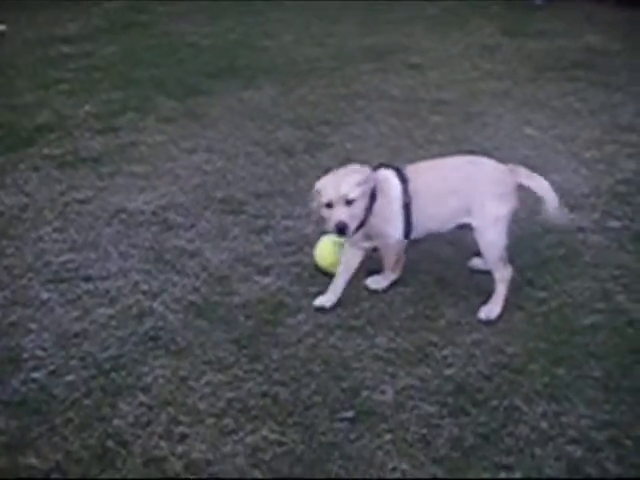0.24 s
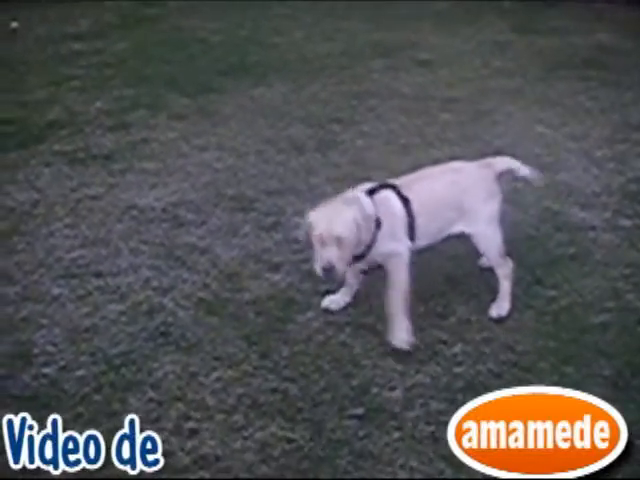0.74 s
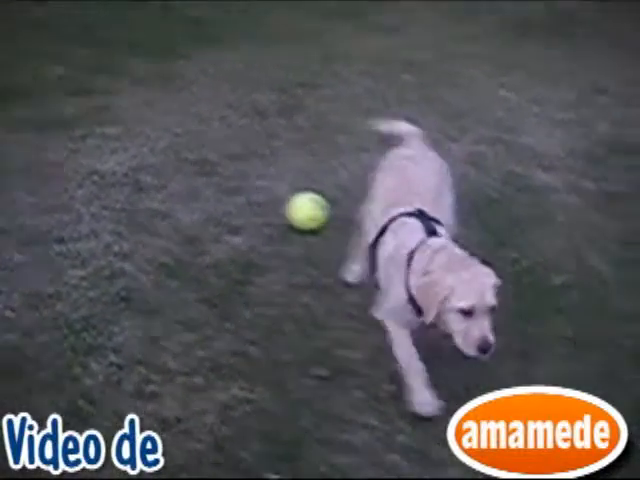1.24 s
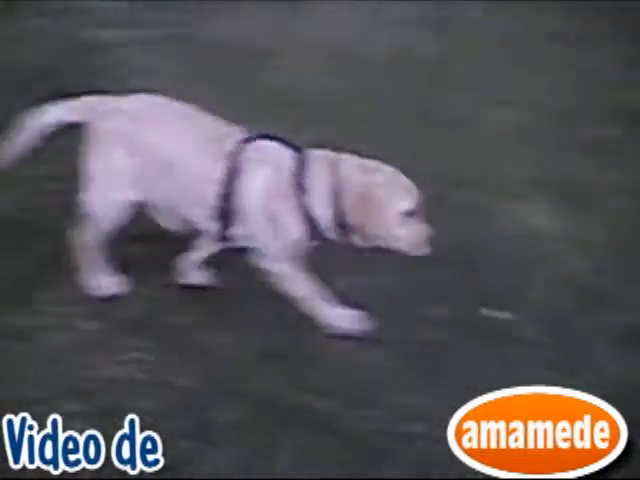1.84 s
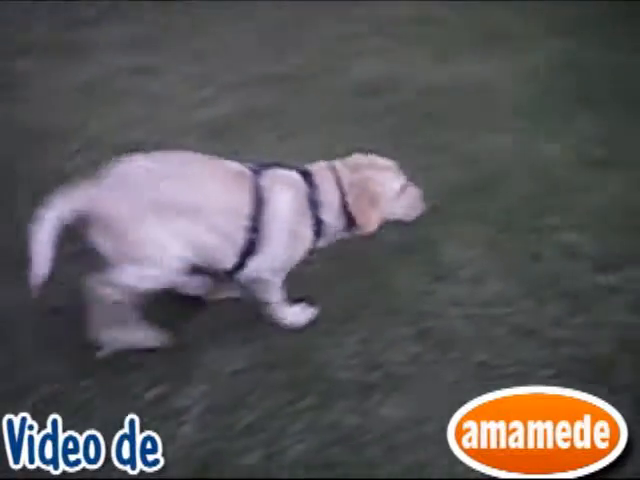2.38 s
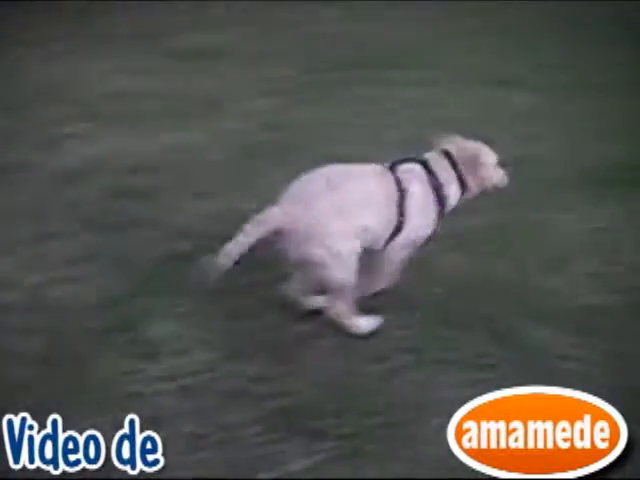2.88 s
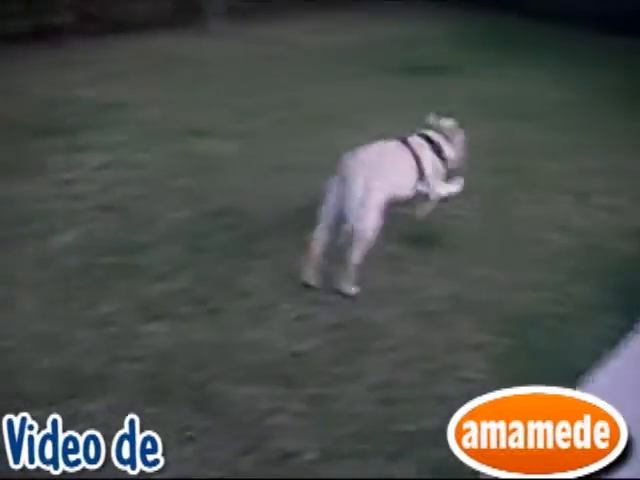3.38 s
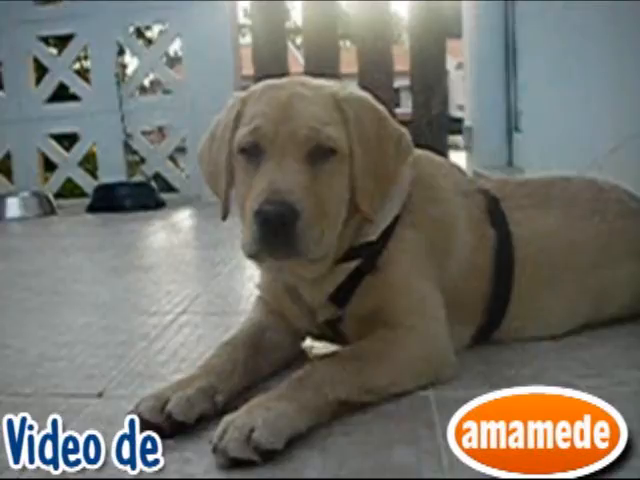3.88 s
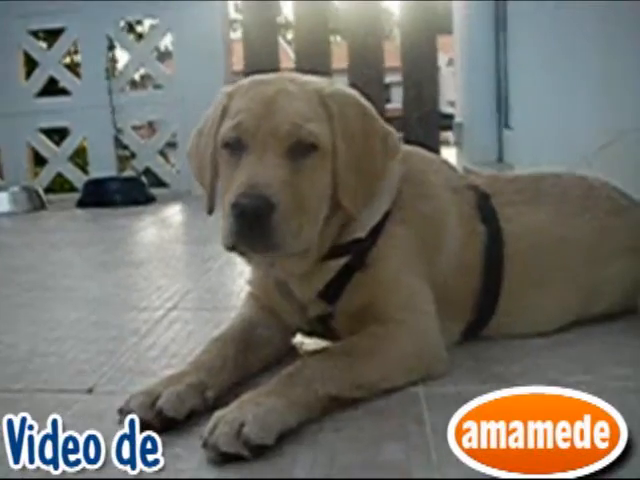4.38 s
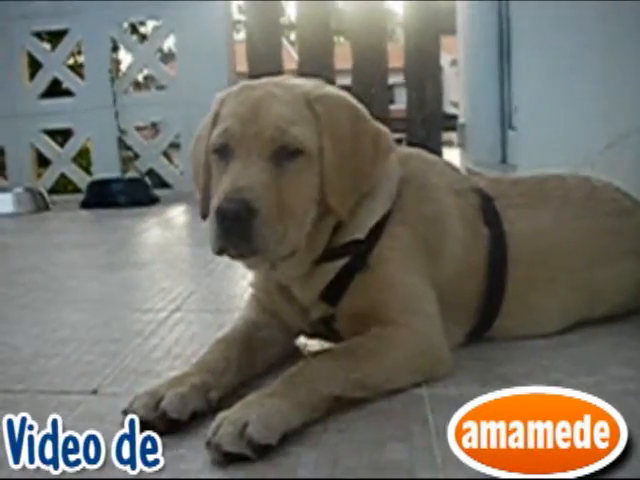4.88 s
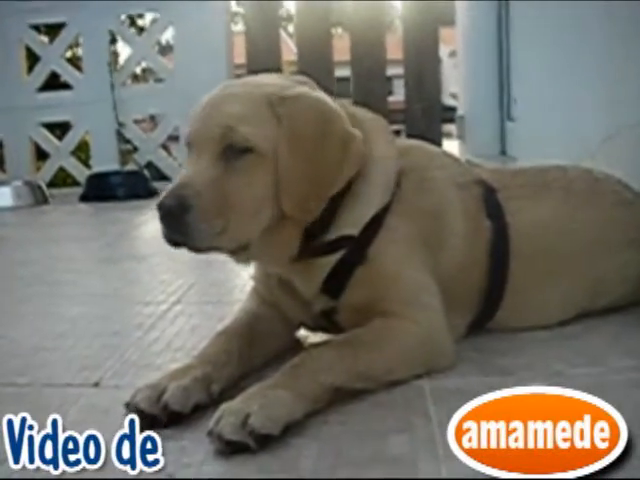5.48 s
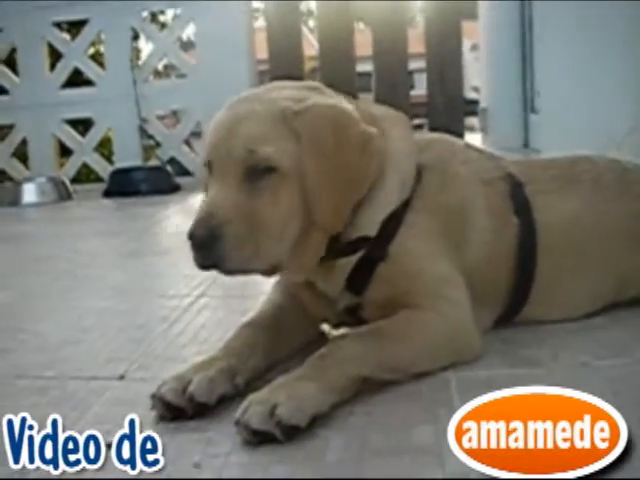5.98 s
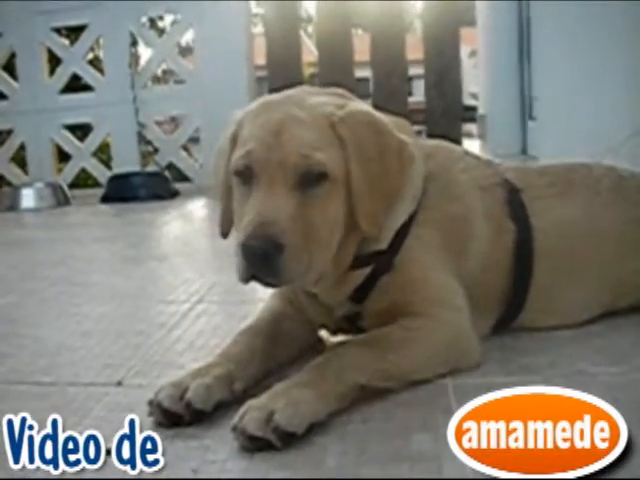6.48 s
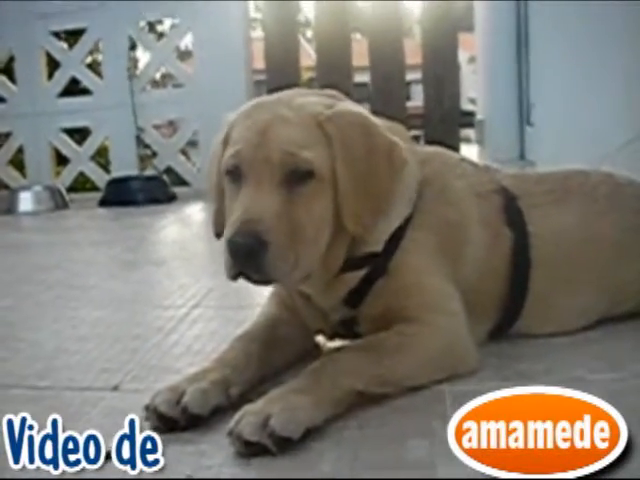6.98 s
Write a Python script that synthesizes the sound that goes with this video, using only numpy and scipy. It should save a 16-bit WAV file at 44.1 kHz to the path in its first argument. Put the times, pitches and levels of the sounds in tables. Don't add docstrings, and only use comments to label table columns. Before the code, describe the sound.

A nearby songbird opens with fast upward flicks, then rounder falling chups and two quick high endings. A gap of soft distant birdsong follows, with a farther bird on the left repeating one flat whistle. The near bird resumes with clucks, rising and falling sweeps, and six strong falling notes, while something hollow is tapped. A small stereo recorder in a garden catches short echoes and constant hiss.

```python
import sys
import numpy as np
from scipy import signal
from scipy.io import wavfile
from scipy.ndimage import uniform_filter1d, minimum_filter1d

SR = 44100
rng = np.random.default_rng(int(sys.argv[2]) if len(sys.argv) > 2 else 0)


def elevation(decibels):
    levels = np.asarray(decibels, float)
    return 10 ** (levels / 20)


def dump(signal):
    limited = np.clip(np.atleast_2d(signal).T, -1, 1)
    pcm = np.round(limited * 32767).astype(np.int16)
    wavfile.write(sys.argv[1], SR, pcm)


N = 318843


def evened(x):
    return x / np.sqrt(np.mean(x ** 2) + 1e-20)


def read(points, hz):
    f, value = np.transpose(points)
    return np.interp(np.log(hz + 1), np.log(f + 1), value)


def band(x, lo_hz, hi_hz, order=2):
    return signal.sosfiltfilt(signal.butter(order, [lo_hz, hi_hz], "bandpass", fs=SR, output="sos"), x)


def add(mix, s, sound):
    part = mix[round(s * SR):][:len(sound)]
    part += sound[:len(part)]


def stroke(rows, quiver_db=0.7):
    s, hz, db = np.transpose(rows)
    t = np.arange(s[0], s[-1], 1 / SR)
    hz = uniform_filter1d(np.interp(t, s, hz), size=70, mode="nearest")
    size = uniform_filter1d(np.interp(t, s, elevation(db)), size=70, mode="nearest")
    quiver = quiver_db * np.sin(2 * np.pi * (rng.uniform(120, 260) * t + rng.random()))
    tone = np.sin(2 * np.pi * (np.cumsum(hz) / SR + rng.random()))
    soft_ends = signal.windows.tukey(len(t), min(1, 90 / len(t)))
    return s[0], size * elevation(quiver) * tone * soft_ends


def glides(table):
    out = np.zeros(N)
    for s, length, first_hz, last_hz, db in table:
        middle = (s + length / 2, (first_hz + last_hz) / 2, db)
        add(out, *stroke([(s, first_hz, db - 12.5), middle, (s + length, last_hz, db - 8.5)]))
    return out


# t/s after its start, f/Hz, level/dB
TRILL = [
    [(0.002, 2900, -49), (0.0045, 4100, -29), (0.008, 5900, -24), (0.012, 7400, -37), (0.018, 8400, -45)],
    [(0.0045, 2400, -44), (0.0075, 4000, -21), (0.0105, 5100, -16.5), (0.0135, 6100, -21),
     (0.016, 6800, -40)],
]
CHUP = [
    [(-0.001, 2250, -32), (0.002, 2520, -12), (0.005, 2680, -8.5), (0.009, 2735, -8), (0.014, 2630, -8.2),
     (0.02, 2380, -8), (0.024, 2082, -16), (0.03, 1850, -30), (0.048, 1430, -48)],
]
LEAD = [
    [(0.0, 2450, -28), (0.003, 1750, -30), (0.008, 1574, -34.5), (0.016, 1396, -45.5)],
    [(0.0, 3500, -54.5), (0.006, 2950, -43), (0.014, 2550, -55.5)],
]
DROP = [
    [(0, 7080, -46), (.005, 5920, -30.5), (.011, 4990, -17.5), (.015, 4650, -19.5), (.02, 3900, -31)],
]
PIP = [
    [(0.0, 2360, -39), (0.007, 2810, -30.5), (0.014, 3330, -42)],
    [(0.008, 2120, -27.5), (0.014, 2260, -23), (0.021, 2350, -20.5), (0.028, 2224, -29.5),
     (0.033, 2430, -39)],
]
RISE = [
    [(0.0, 2790, -24), (0.004, 2740, -18.5), (0.01, 3013, -10), (0.016, 3320, -14), (0.021, 3876, -9.5),
     (0.026, 4300, -14.5)],
]
FALL = [
    [(0.002, 8100, -56), (0.007, 6010, -17), (0.011, 4310, -12), (0.014, 3460, -20)],
    [(0.0, 12490, -33), (0.006, 9500, -40), (0.012, 5960, -33.5), (0.016, 4700, -12), (0.022, 4203, -13),
     (0.029, 3910, -18)],
    [(0.026, 2800, -32), (0.032, 2950, -14), (0.036, 2930, -6.5), (0.044, 2550, -7), (0.049, 2100, -13),
     (0.053, 1900, -32), (0.06, 1600, -42)],
]
LIFT = [
    [(0.0, 2050, -29), (0.006, 3300, -22), (0.011, 4200, -8), (0.015, 4550, -13), (0.019, 4700, -12.5),
     (0.027, 4800, -21), (0.033, 4850, -32), (0.041, 4900, -44)],
]
HOOK = [
    [(0.0, 1950, -38), (0.004, 2170, -19), (0.01, 2295, -11), (0.016, 2070, -14.5), (0.019, 1930, -25),
     (0.025, 1600, -41)],
]
# t/s after its start, f/Hz, level/dB
CLIPPED_CHUP = [
    [(0.0, 2570, -33), (0.003, 2720, -12), (0.009, 2620, -9.5), (0.016, 2410, -8), (0.022, 2010, -20),
     (0.03, 1770, -33), (0.044, 1520, -40)],
]
DIP = [
    [(0.001, 6500, -44), (0.004, 4300, -28), (0.008, 3300, -17), (0.014, 3400, -19), (0.019, 4000, -10.5),
     (0.022, 4900, -22), (0.026, 6400, -36)],
    [(0.0, 4400, -24), (0.002, 3500, -17), (0.004, 2600, -27), (0.007, 2000, -38)],
]
FORK = [
    [(0.005, 4300, -30), (0.009, 3850, -19), (0.017, 3900, -17)],
]
BOWL = [
    [(0.0, 5000, -32), (0.004, 3800, -24), (0.01, 3200, -22), (0.016, 3500, -24), (0.019, 3950, -12),
     (0.021, 4500, -27), (0.023, 5000, -16), (0.025, 5800, -34), (0.03, 7800, -46)],
    [(0.0, 4300, -27), (0.002, 3000, -25), (0.005, 2000, -36)],
]
SIGH = [
    [(0.0, 7870, -69), (0.015, 6330, -62), (0.035, 5560, -53), (0.065, 5230, -43), (0.09, 4910, -28),
     (0.108, 4877, -20.5), (0.121, 4940, -27), (0.126, 5150, -43), (0.133, 5600, -50)],
    [(0.125, 4930, -46), (0.18, 4920, -50), (0.205, 4915, -60), (0.23, 4915, -52), (0.31, 4910, -52),
     (0.33, 4910, -63), (0.365, 4910, -51), (0.41, 4905, -61), (0.54, 4900, -62)],
]
DUET = [
    [(0.007, 4680, -43), (0.019, 4810, -31.5), (0.039, 4766, -23.5), (0.054, 4660, -37), (0.079, 4784, -33),
     (0.091, 4800, -38)],
    [(0.0, 5960, -52), (0.044, 6120, -37.5), (0.064, 6000, -43), (0.091, 6140, -57)],
]
SLIDE = [
    [(0.0, 6500, -60), (0.012, 6010, -36), (0.022, 6140, -32), (0.029, 6040, -40)],
    [(0.009, 4550, -32.5), (0.022, 4690, -32), (0.034, 4470, -24), (0.045, 3940, -10.5),
     (0.055, 3300, -16.5), (0.065, 3030, -11.5), (0.075, 2975, -19), (0.083, 2680, -39)],
]
SURGE = [
    [(0.0, 2720, -28), (0.004, 2720, -18), (0.012, 3020, -15.5), (0.018, 3550, -17), (0.022, 4050, -9.5),
     (0.026, 4300, -24)],
    [(0.035, 5500, -32), (0.039, 5450, -19), (0.044, 5250, -16), (0.047, 4800, -21), (0.051, 4300, -30)],
]
HELD = [
    [(0.0, 2280, -30), (0.003, 2240, -17), (0.01, 2170, -17.5), (0.018, 2050, -30), (0.026, 2129, -13),
     (0.035, 2090, -14), (0.038, 1920, -27), (0.045, 1650, -32)],
]
# t/s, effort level/dB, stretch in time [factor], shift of f [factor]
TRILLS = [
    (0.025, 1, 1.01),
    (0.085, 1.1, 0.95),
    (0.143, 1.1, 1.01),
    (0.202, 0.8, 1.01),
    (0.263, 1, 1.01),
    (0.3245, 1, 1.01),
    (0.384, 1.5, 1.05),
    (0.45, 3, 1.08, 0.95),
]
CHUPS = [
    (.556, -1.5, .88, .98),
    (.8053, -.3, 1.12, 1.035),
    (.941, .3, 1, 1),
    (1.0715, .7, .98, 1.005),
    (1.213, .1, 1.16, 1.02),
    (1.3505, .3, 1.24, .99),
]
DROPS = [
    (5.89, -1.6, .8, 0.98),
    (6.074, -0.33, 1.2, 0.99),
    (6.177, -0.67, 0.91, 1.027),
]
PIPS = [
    (5.3118, 0.15, 1.1, 1.044),
    (5.397, -0.27, 1.03, 1.014),
    (5.483, -0.88, 1.08, 1.02),
]
RISES = [
    (5.855, 0.6, 0.91, 0.96),
    (6.041, -1, 0.95, 0.96),
    (6.143, 1.5, 0.92, 0.97),
]
FALLS = [
    (6.4403, -1),
    (6.579, -1.9),
    (6.724, -0.19),
    (6.874, -1.3),
    (7.014, -1.6, 1.04),
    (7.1512, -2.3),
]
LIFTS = [
    (1.487, 0.1, 1.01),
    (1.5755, -1.5, 0.85),
]
HOOKS = [
    (6.296, -1.5),
    (6.329, -2.5, 0.84, 1.015),
]
# pattern, t/s
ONCE = [
    (CLIPPED_CHUP, 0.684),
    (DIP, 1.467),
    (FORK, 1.467),
    (BOWL, 1.555),
    (SIGH, 4.345),
    (DUET, 5.136),
    (SLIDE, 5.563),
    (SURGE, 5.9475),
    (HELD, 6.246),
]
# t/s, length/s, first f/Hz, last f/Hz, level/dB
CLUCKS = [
    (1.677, 0.006, 2770, 4170, -28),
    (4.222, 0.007, 4200, 3200, -34.5),
    (4.226, 0.0074, 3200, 2400, -35),
    (4.567, 0.008, 4600, 2700, -32.5),
    (4.602, 0.009, 2400, 1940, -34.5),
    (4.778, 0.012, 2650, 2450, -30.5),
    (4.785, 0.007, 3300, 2700, -41),
    (4.779, 0.011, 3970, 3500, -39.5),
    (5.877, 0.011, 4250, 5050, -28),
    (5.851, 0.006, 2550, 2650, -30),
]
# t/s, first f/Hz, last f/Hz, sag of f/Hz,
# level/dB, sag of level/dB, step/s
ROLLS = [
    (4.9425, 2650, 2420, -50, -29, -2.1, 0.0146),
    (5.72, 2550, 2250, -15, -37, -0.5, 0.0133),
    (5.72, 1800, 1650, -5, -40, -0.8, 0.0133),
]


def near_bird():
    rasp = 1 + 0.3 * evened(band(rng.standard_normal(N), 150, 690))
    rolled = []
    for s, first_hz, last_hz, sag_hz, db, sag_db, step_s in ROLLS:
        for k in range(6):
            bend_hz = sag_hz * (k - 3) ** 2
            level_db = db + sag_db * (k - 5 / 2) ** 2
            rolled.append((s + k * step_s, 0.009, first_hz + bend_hz, last_hz + bend_hz, level_db))
    out = glides(CLUCKS + rolled) * rasp
    lead_s, soft_db, full_db, warm_s = 0.0263, -1.5, 3.5, 0.75
    chup_times = [row[0] for row in CHUPS] + [ONCE[0][1]]
    leads = [(s - lead_s, soft_db if s < warm_s else full_db) for s in chup_times]
    song = [(TRILL, TRILLS), (CHUP, CHUPS), (LEAD, leads), (DROP, DROPS), (PIP, PIPS), (RISE, RISES),
            (FALL, FALLS), (LIFT, LIFTS), (HOOK, HOOKS)]
    song += [(syllable, [(s,)]) for syllable, s in ONCE]
    for syllable, times in song:
        for row in times:
            s, effort_db, stretch, pitch = row + (0, 0, 1, 1)[len(row):]
            for rows in syllable:
                add(out, *stroke(np.array(rows) * [stretch, pitch, 1] + [s, 0, effort_db]))
    return out


# t/s, length/s, f/Hz, level/dB
WHISTLES = [(0.088, 0.044, 2420, -48), (3.0, 0.115, 2590, -52), (3.22, 0.095, 2550, -50),
            (3.415, 0.08, 2560, -50), (3.605, 0.09, 2510, -49), (3.785, 0.095, 2435, -48),
            (3.995, 0.075, 2440, -48), (4.18, 0.075, 2530, -46), (4.375, 0.087, 2410, -46),
            (4.565, 0.095, 2480, -47), (4.815, 0.08, 2490, -49), (5.045, 0.105, 2390, -48),
            (5.345, 0.045, 2480, -47), (5.545, 0.08, 2430, -49), (5.79, 0.055, 2520, -47),
            (6.06, 0.075, 2380, -47)]
# share of its length, shift of f [factor], level/dB
WHISTLE_SHAPE = [
    (0, 0.96, -7),
    (0.25, 0.997, -0.5),
    (0.7, 1.007, -1.5),
    (1, 0.97, -6),
]


def far_bird(ratio):
    out = np.zeros(N)
    for start, length, hz, db in WHISTLES:
        scoop = (-.015 / length, .88, -17)
        rows = np.array([scoop] + WHISTLE_SHAPE) * [length, hz * ratio, 1] + [start, 0, db]
        s, tone = stroke(rows)
        add(out, s, elevation(5.2) * tone)
        add(out, s + .105, elevation(-5.5) * tone)
    return out


# t/s, blow level/dB, level/dB of the thump under it
TAPS = [(1.482, -49, -34.5), (2.144, -24.5, -67), (2.723, -31, -55), (3.851, -46, -38), (5.081, -16, -36),
        (5.537, -15, -37), (5.579, -34, -34), (5.623, -29, -32), (5.7245, -21.5, -37), (5.781, -21, -43),
        (5.887, -20.5, -42), (5.988, -20.5, -40), (6.111, -23.5, -39)]
# f/Hz, level/dB, time to fade by 60 dB/s
HOLLOW = [
    (858, -2, 0.023),
    (1390, 3.5, 0.0027),
    (2400, -48, .006),
    (410, 3.5, 0.0083),
]


def taps():
    out, t = np.zeros(N), np.arange(4000) / SR
    ring = sum(elevation(db - 60 * t / t60) * np.cos(2 * np.pi * hz * t) for hz, db, t60 in HOLLOW)
    ring = band(np.r_[np.zeros(400), ring], 330, 3000, order=4)
    muffled = 1.4 * band(ring, 380, 2120)
    thump = np.sin(2 * np.pi * 210 * t) * elevation(-60 * t / 0.012)
    for s, blow_db, thump_db in TAPS:
        add(out, s - 400 / SR + 0.00246, elevation(blow_db - 1.5) * (ring if s > 3 else muffled))
        add(out, s, elevation(thump_db + 10) * thump)
    return out


# t/s, level/dB
RUSTLE = [
    (0.37, -57),
    (0.414, -38),
    (0.472, -38),
    (0.498, -44),
    (0.52, -60),
]


def rustle():
    s, db = np.transpose(RUSTLE)
    grains = rng.standard_normal(N) * elevation(2.2 * rng.exponential(1, N))
    loudness = elevation(np.interp(np.arange(N) / SR, s, db, -120, -120))
    return loudness * evened(band(grains, 720, 1490))


# t/s, length/s, first f/Hz, last f/Hz, level/dB
DISTANT = [(2.0, 0.087, 4700, 5780, -57), (2.08, 0.055, 2880, 3150, -51), (2.122, 0.045, 3050, 4250, -47),
           (3.35, 0.03, 4500, 3950, -55), (2.32, 0.035, 3640, 3520, -51), (4.31, 0.065, 4700, 4250, -56),
           (4.38, .09, 4300, 4400, -55), (5.03, .07, 4600, 4150, -57), (.87, 0.055, 4700, 4620, -56.5),
           (4.75, .035, 5800, 5000, -58), (6.372, 0.045, 4600, 3350, -47)]
# length/s, first f/Hz, last f/Hz
UPSLUR = (0.055, 3950, 4750)
# t/s, level/dB
UPSLURS = [
    (2.31, -62),
    (2.47, -60),
    (2.63, -60),
    (2.79, -59),
    (2.95, -55),
    (3.11, -55),
    (3.29, -58),
    (3.53, -61),
]
# length/s, first f/Hz, last f/Hz
SEEP = (0.1, 5640, 5500)
# t/s, level/dB
SEEPS = [
    (2.17, -69),
    (2.32, -69),
    (2.5, -70),
    (2.65, -68),
    (2.82, -69),
]


def distant_birds():
    twitter = [(s, .022, 5600, 5000, -62) for s in 3.66 + .058 * np.arange(10)]
    chatter = []
    for a, b, c, d in rng.random((30, 4)):
        first_hz = 3500 + 2200 * c
        chatter.append((1.8 + 3.5 * a, .02 + .05 * b, first_hz, first_hz + 900 * (d - .5), -59 - 6 * b))
    repeated = [(s, *note, db) for note, times in [(UPSLUR, UPSLURS), (SEEP, SEEPS)] for s, db in times]
    flutter = 1 + 0.25 * evened(band(rng.standard_normal(N), 20, 160))
    return glides(DISTANT + chatter + twitter + repeated) * flutter


# delay t/s, level/dB
ECHOES = [
    (.0045, -18),
    (.0085, -23.5),
    (.013, -24.5),
    (.095, -44.5),
    (0.121, -42.5),
]
# f/Hz, time to fade by 60 dB/s
GARDEN = [
    (1500, .5),
    (2800, .72),
    (4500, .75),
    (4950, 1.05),
    (5500, 1.05),
    (8000, .6),
    (13000, .3),
]


def garden(x, quick_db=-18, quick_t60=0.074, long_db=-27):
    t = np.arange(SR) / SR
    scatter = rng.standard_normal((2, SR)) * (t > .003)
    hz, frames, z = signal.stft(scatter, SR, nperseg=256)
    fade = elevation(-60 * frames / read(GARDEN, hz)[:, None])
    tail = signal.istft(z * fade, SR, nperseg=256)[1][:, :SR]
    quick = (band(scatter, 3400, 9000) + 0.18 * scatter) * elevation(-60 * t / quick_t60)
    answer = elevation(long_db) * tail / np.linalg.norm(tail[0])
    answer += elevation(quick_db) * quick / np.linalg.norm(quick[0])
    for s, db in ECHOES:
        answer[0, round(s * SR)] += elevation(db)
    return signal.fftconvolve(x[None], answer, axes=1)[:, :N]


# f/Hz, level/dB (per Hz)
AIR = [(60, -40.5), (95, -9), (140, -4.5), (240, -1.5), (750, -2.5), (2150, -8.5), (3300, -11.5),
       (4800, -17.5), (6000, -30.5), (8500, -37.5), (11500, -30.5), (13500, -59.5)]


def air(patchy_db=1.29):
    frames, hz = N // 256 + 5, np.fft.rfftfreq(1024, 1 / SR)
    a, b, patches = rng.standard_normal((frames, 513, 3)).T
    patches = evened(uniform_filter1d(uniform_filter1d(patches, size=10, axis=0), size=14, axis=1))
    z = (a + 1j * b) * elevation(read(AIR, hz)[:, None] + patchy_db * patches)
    return elevation(-46) * evened(signal.istft(z, nperseg=1024, noverlap=768)[1][:N])


def scene():
    near, far, upper = near_bird(), far_bird(1), far_bird(3 / 2)
    distant = distant_birds()
    wet_mid, wet_side = garden(near + far + 3 * distant)
    mid = near + far + elevation(-22.5) * upper + distant + wet_mid + taps() + rustle() + air()
    side = -.06 * near - 0.26 * np.gradient(near)
    side += 0.77 * far - 3.0 * np.gradient(far) + elevation(-3.5) * upper
    side += 1.1 * distant + elevation(-2.5) * wet_side + elevation(-5) * air()
    side = band(side, 1900, 4060, order=6)
    return np.array([mid + side, mid - side])


def haze(x, frames, bins, db, lag):
    hz, _, z = signal.stft(x, SR, nperseg=256, noverlap=192)
    power = abs(z) ** 2
    steady = minimum_filter1d(uniform_filter1d(power, size=3, axis=0), size=11, axis=1)
    steady = -minimum_filter1d(-steady, size=19, axis=1)
    treble_share = np.clip((hz[:, None] - 2900) / 1500, .06, 1) ** 2
    power = np.maximum(power - 5 * steady, 0) * treble_share
    for _ in range(2):
        power = uniform_filter1d(uniform_filter1d(power, size=bins, axis=0), size=frames, axis=1, origin=lag)
    a, b = rng.standard_normal((z.shape[1], len(z), 2)).T
    grain = np.sqrt(abs(power)) * (a + 1j * b)
    return elevation(db) * signal.istft(grain, nperseg=256, noverlap=192)[1][:N]


def starve(x, from_hz=5200, below_db=-50, chance_db=9):
    hz, _, z = signal.stft(x - x.mean(), SR, nperseg=1024, noverlap=768)
    power = uniform_filter1d(abs(z.mean(0)) ** 2, size=7, axis=0)
    strips = rng.standard_normal(power.T.shape).T
    strips = evened(uniform_filter1d(uniform_filter1d(strips, size=4, axis=0), size=16, axis=1))
    weak = power * elevation(2 * chance_db * strips) < elevation(2 * below_db) * power.max(0)
    lost = (hz[:, None] > from_hz) & weak
    return x - signal.istft(z * lost, nperseg=1024, noverlap=768)[1][:, :N]


def strip(lo_hz, hi_hz, open_share=0.7):
    is_open = rng.random(N // 1024 + 1) < open_share
    gate = uniform_filter1d(np.repeat(is_open, 1024)[:N] * 1., size=200)
    mid, side = band(rng.standard_normal((2, N)), lo_hz, hi_hz, order=4)
    return gate * evened(mid + 0.1 * side * np.array([[1], [-1]]))


def top_cut(x):
    return signal.sosfilt(signal.butter(12, 13730, fs=SR, output="sos"), x)


def record(dry):
    knee = 1.3
    bent = knee * np.tanh(dry / knee) + 0.03 * (dry ** 2 - uniform_filter1d(dry ** 2, size=60))
    centre = dry.mean(0)
    grain = haze(centre, 7, 9, -9, 0) + haze(centre, 28, 25, -17.5, 5)
    dull = signal.sosfiltfilt(signal.butter(8, 8700, fs=SR, output="sos"), bent + grain)
    bent = dull + elevation(-8) * (bent - dull)
    treble = uniform_filter1d(band(grain, 3100, 9000) ** 2, size=1600, origin=400)
    body = uniform_filter1d(centre ** 2, size=3000)
    fizz = elevation(-24) * abs(treble) ** 0.5 * strip(11600, 12500, open_share=0.85)
    sheen = elevation(-34) * abs(treble) ** 0.5 * (strip(9700, 10100) + strip(10800, 11300, open_share=0.5))
    splash = elevation(-46) * abs(body) ** 0.5 * strip(3300, 6600, open_share=0.8)
    rumble = elevation(-33.5) * abs(body) ** 0.51 * evened(band(rng.standard_normal(N), 19, 89))
    offset = -.0477
    return top_cut(starve(bent) + fizz + sheen + splash + rumble + offset)


dry = scene()
out = record(dry)
dump(out)
```